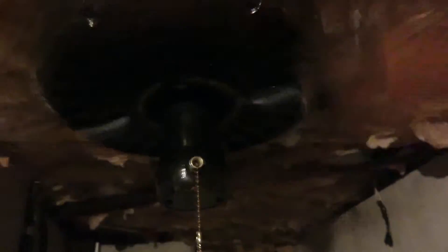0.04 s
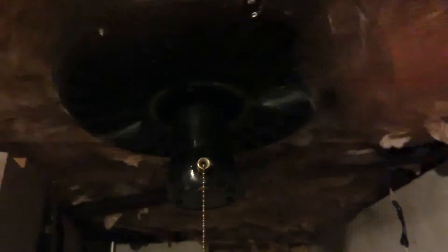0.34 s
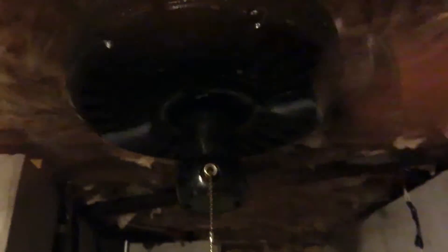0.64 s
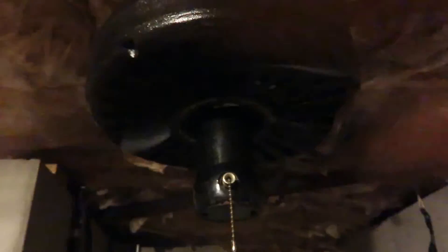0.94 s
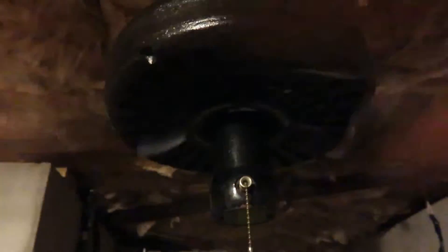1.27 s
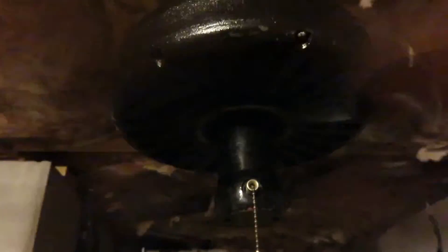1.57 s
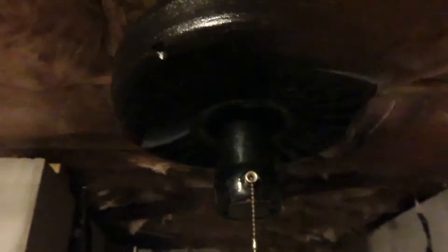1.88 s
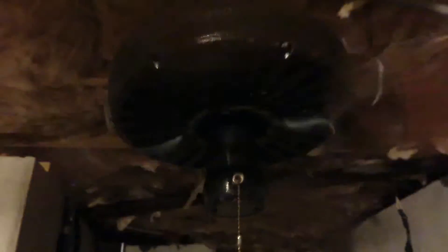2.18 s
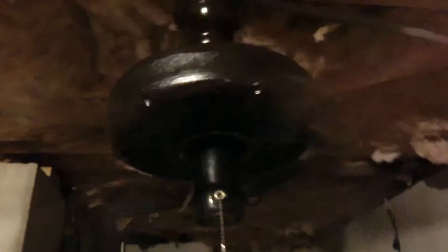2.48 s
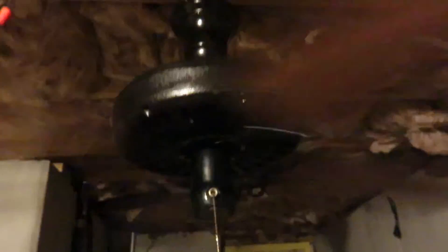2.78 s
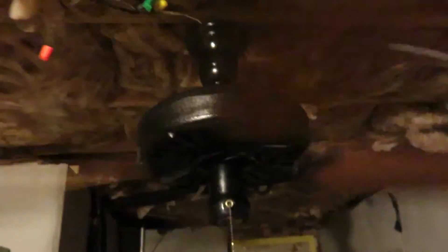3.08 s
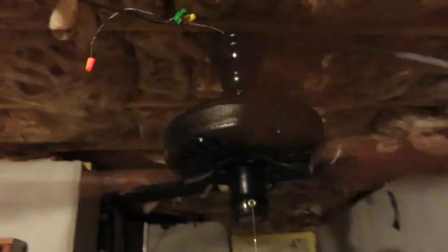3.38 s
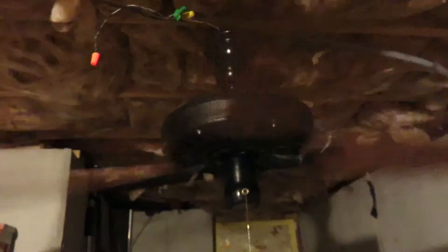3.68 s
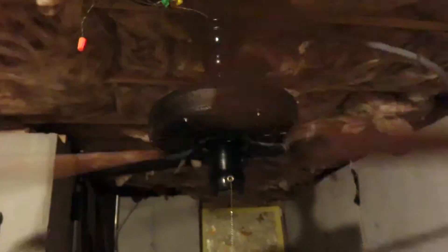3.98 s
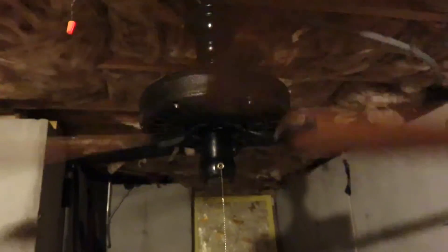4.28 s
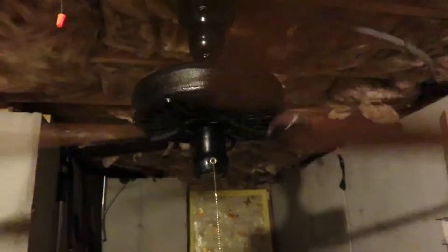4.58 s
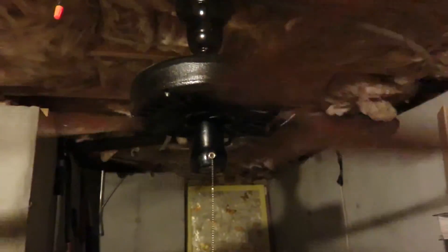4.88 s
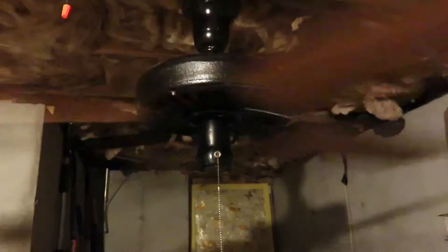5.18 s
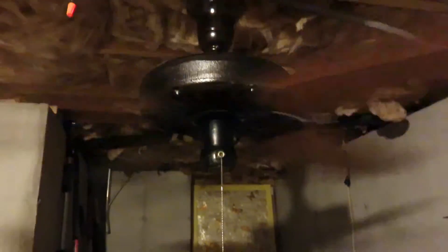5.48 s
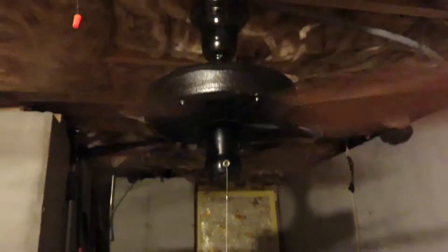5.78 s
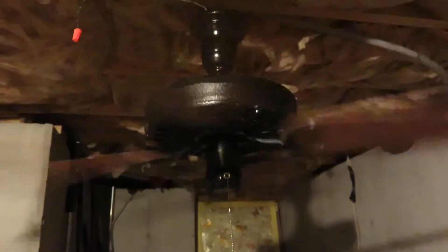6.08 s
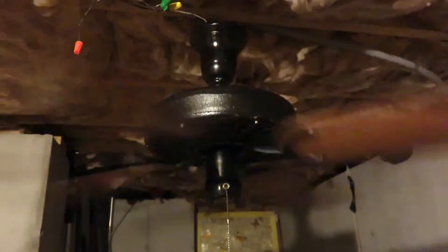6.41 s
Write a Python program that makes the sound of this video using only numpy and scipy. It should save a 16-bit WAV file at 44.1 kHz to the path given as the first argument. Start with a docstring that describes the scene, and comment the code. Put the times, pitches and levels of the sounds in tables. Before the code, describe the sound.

A ceiling fan's pull chain snaps sharply, then the swishing blades slow while their draught thumps against the microphone.

```python
"""A small room, close under a ceiling fan that is switched down by its pull chain.
Over a faint hiss of air the motor hums and a sleeve rustles a few times. The blades swish past ever
more slowly, and their downdraught buffets the microphone until it is drawn back. Early on comes the
tug: beads tick through the eyelet, the fan body thuds, and the switch snaps in and out."""
import sys
import numpy as np
from scipy import signal
from scipy.fft import rfft, irfft, next_fast_len
from scipy.io import wavfile
from scipy.ndimage import map_coordinates

SR = 44100
rng = np.random.default_rng(int(sys.argv[2]) if len(sys.argv) > 2 else 0)


def dump(signal):
    """Clip the signal to [-1, 1] and save it as 16-bit WAV at the path in sys.argv[1]."""
    limited = np.clip(np.atleast_2d(signal).T, -1, 1)
    pcm = np.round(limited * 32767).astype(np.int16)
    wavfile.write(sys.argv[1], SR, pcm)


N = 293265


def amp(db):
    """Decibels to gain."""
    return 10 ** (np.asarray(db) / 20)


def unit_rms(x):
    """x scaled to rms 1."""
    return x / np.sqrt(np.mean(x ** 2) + 1e-20)


def unit_peak(x):
    """x scaled to peak 1."""
    return x / np.abs(x).max()


def along(points, hz):
    """Reads (Hz, value) points on a log frequency axis."""
    freqs, values = np.transpose(points)
    return np.interp(np.log(hz + 1), np.log(freqs + 1), values)


def clock():
    """The time of every sample in seconds."""
    return np.arange(N) / SR


def curve(rows, column=1):
    """An automation lane: one column of (seconds, value, ..) rows, joined by straight lines."""
    columns = np.transpose(rows)
    return np.interp(clock(), columns[0], columns[column])


def wobble(rate):
    """A smooth random drift with `rate` knots a second."""
    knots = rng.standard_normal(int(N * rate / SR) + 4)
    return map_coordinates(knots, [np.arange(N) * rate / SR])


def filtered(x, response):
    """Equalises x by a gain that is a function of frequency."""
    size = x.shape[-1]
    padded = next_fast_len(size + 8192)
    return irfft(rfft(x, padded) * response(np.fft.rfftfreq(padded, 1 / SR)), padded)[..., :size]


def noise(spectrum, coherence, size=N):
    """Stereo noise of rms 1 with a given colour and left-right coherence."""
    def mid_side_gains(hz):
        width = np.arccos(np.clip(along(coherence, hz), -1, 1)) / 2
        return amp(along(spectrum, hz)) * [np.cos(width), np.sin(width)]
    mid, side = filtered(rng.standard_normal((2, size)), mid_side_gains)
    return unit_rms(np.array([mid + side, mid - side]))


def add(track, start, sound):
    """Mixes a sound into a track at `start` seconds."""
    part = track[..., max(round(start * SR), 0):][..., :sound.shape[-1]]
    part += sound[..., :part.shape[-1]]


def rubbing(strokes, spectrum, coherence, grain_db):
    """Soft, grainy strokes of friction that swell and fade."""
    swell = sum(amp(db) * np.exp(-.5 * ((clock() - s) / width) ** 2) for s, db, width in strokes)
    return swell * unit_rms(noise(spectrum, coherence) * amp(grain_db * wobble(280)))


# Colour of the room tone. Each row: frequency in Hz, relative level in dB.
AIR_COLOUR = [(20, -23), (45, -14), (62, -9), (130, -19), (260, 4), (420, -1.5), (900, 4), (2000, 0.5),
              (4000, -4.5), (6000, -10.5), (9000, -17), (12000, -22.5), (15500, -30)]
# Stereo image of diffuse sound. Each row: frequency in Hz, left-right coherence.
WIDE_IMAGE = [(120, .99), (250, 1), (500, -1.06), (950, -0.039), (1900, 0.22), (3800, 0.44), (7500, 0.16),
              (15000, -0.34)]

def room_tone(level_db=-51):
    """The air of the room lays a faint, steady hiss under everything."""
    return amp(level_db) * noise(AIR_COLOUR, WIDE_IMAGE)


def room_reverb(x, t60=0.14, wet_db=-21):
    """Close walls answer with a short tail, different on each side."""
    t = np.arange(SR // 3) / SR
    tail = rng.standard_normal((2, len(t))) * amp(-60 * t / t60) * (t > .004)  # 4 ms pre-delay
    return amp(wet_db) * signal.fftconvolve(x, tail / np.linalg.norm(tail[0]), axes=1)[:, :N]


# Sleeve rustles. Each row: centre in seconds, level in dB, half length in seconds.
SLEEVE_STROKES = [(1.98, -62, .02), (2.32, -60, 0.024), (2.708, -47.5, 0.014), (3.183, -55.5, 0.019),
                  (3.59, -64, 0.034), (3.772, -59, 0.025)]
# Colour of the cloth. Each row: frequency in Hz, relative level in dB.
CLOTH_COLOUR = [(1200, -14), (2500, 1), (4500, -4.5), (6000, 1), (9000, -5), (13000, -4.5), (16000, -18)]

def sleeve():
    """Cloth brushes on cloth as the arm draws back."""
    return rubbing(SLEEVE_STROKES, CLOTH_COLOUR, WIDE_IMAGE, grain_db=-1.0)


# From fan to microphone, drawn back halfway through. Each row: time in seconds, distance in metres.
MIC_DISTANCE = [(0, 0.3), (.2, .21), (.45, .28), (2.7, 0.29), (3.15, 0.37), (3.9, 0.54), (6.65, 0.56)]

def motor(mains_hz=60, mains_db=-9, waver_db=2, fast_db=-48.5, slow_db=-63.5, switch_s=0.36):
    """A hum at twice the mains frequency, fainter at the mains itself, wavers as the fan rocks."""
    phase = 2 * np.pi * mains_hz * clock()
    low = amp(mains_db) * unit_rms(np.sin(phase + 1.4 * wobble(2.34)))
    high = unit_rms(np.sin(2 * phase + 2.5 * wobble(8.3)) * amp(waver_db * wobble(4.9)))
    setting_db = curve([(switch_s, fast_db), (switch_s + 0.027, slow_db)])
    return amp(setting_db) / curve(MIC_DISTANCE) * (low + high)


FAST_PASS_HZ, SLOW_PASS_HZ = 13.78, 8.71

def blades_passed(t, coast_s=2.9, start_phase=.485):
    """Blades gone by at time t: drag slows the rotor towards its lower speed."""
    coasting = (FAST_PASS_HZ - SLOW_PASS_HZ) * coast_s * (1 - np.exp(-t / coast_s))
    return start_phase + SLOW_PASS_HZ * t + coasting


def blade_pulse(lag_s, crest=0.082):
    """Near +1 as a blade goes by and -1 between blades, the crest narrower than the lull."""
    angle = 2 * np.pi * blades_passed(clock() - lag_s)
    return np.cos(angle) + crest * np.cos(2 * angle)


# Colours of the swish, the trailing edge at full speed and the high wash.
# Each row: frequency in Hz, relative level in dB.
SWISH_COLOUR = [(80, -14.5), (200, 4.5), (420, 4.5), (600, 1.5), (800, -2), (1050, -11.5), (1600, -21.5),
                (4000, -51)]
EDGE_COLOUR = [(300, -44), (560, -12), (760, 4.5), (900, -7), (1150, -16), (2200, -51)]
WASH_COLOUR = [(500, -30), (1000, -10), (1600, -13), (2700, -20), (4500, -36.5), (10000, -55)]
# How deeply the swish pulses where the microphone is held. Each row: time in seconds, swing in dB.
SWISH_DEPTH = [(0, 3.5), (.45, 4.8), (1.1, 4.2), (1.7, 5), (2.2, 3.2), (2.9, 4), (3.5, 5), (4.3, 3.2),
               (6.65, 2.4)]
# Stereo image of close sounds. Each row: frequency in Hz, left-right coherence.
CLOSE_IMAGE = [(100, 1), (250, 1), (500, 0.98), (1000, 1), (3000, 0.89), (10000, 0.21)]

def blades(level_db=-50, speed_power=1.62, body_db=0.64, edge_db=-2.5, wash_db=-9.0, uneven_db=0.83):
    """Each blade swishes over a steadier wash; its hollow edge note sinks and fades with the speed."""
    passed = blades_passed(clock())
    speed = np.gradient(passed) * SR / FAST_PASS_HZ  # 1 on the fast setting
    read_at = passed / FAST_PASS_HZ * SR  # varispeed: the edge note follows the rotor
    edge = np.array([map_coordinates(side, [read_at]) for side in noise(EDGE_COLOUR, CLOSE_IMAGE)])
    swish = amp(body_db) * noise(SWISH_COLOUR, CLOSE_IMAGE) + amp(edge_db) * speed ** 4 * edge
    swell = amp(curve(SWISH_DEPTH) * blade_pulse(lag_s=0.00036) + uneven_db * wobble(11))
    wash = amp(wash_db) * swell ** 0.49 * noise(WASH_COLOUR, CLOSE_IMAGE)
    return amp(level_db) * speed ** speed_power / curve(MIC_DISTANCE) * (swell * swish + wash)


# The microphone lies in the downdraught, crosses its core, leaves it and drifts back to its edge.
# Each row: time in seconds, buffet fader in dB, rumble fader in dB.
DRAUGHT_FADERS = [(0, -33, -50), (.45, -40, -44.5), (.8, -34, -45), (1.4, -39.5, -46), (2.35, -36, -42),
                  (2.7, -34, -41), (2.8, -33, -35), (2.87, -47, -67), (3.3, -49, -68), (4.4, -53, -88),
                  (5.4, -45, -56), (6.65, -47, -55.5)]
# Colours of the buffet and the deep rumble. Each row: frequency in Hz, relative level in dB.
BUFFET_COLOUR = [(30, -21), (60, -6.5), (125, 1), (220, -5), (350, -6), (550, -23.5), (900, -37),
                 (2000, -61)]
RUMBLE_COLOUR = [(12, -14), (30, -4), (62, 6), (90, 2), (160, 0), (400, -70)]
# Stereo image at the microphone's ports. Each row: frequency in Hz, left-right coherence.
PORT_IMAGE = [(70, 0.98), (130, 1), (250, 0.87), (500, 0.47), (1000, 0.059)]

def draught(buffet_db=1.26, rumble_db=5.0, depth_db=3.0, lumpy_db=1.9):
    """Each blade's wake hits the microphone as a lumpy low puff, over a rumble that pulses less."""
    puffs = unit_rms(amp(depth_db * blade_pulse(lag_s=0.0051) + lumpy_db * wobble(35)))
    buffet = amp(curve(DRAUGHT_FADERS) + buffet_db) * noise(BUFFET_COLOUR, PORT_IMAGE)
    rumble = amp(curve(DRAUGHT_FADERS, column=2) + rumble_db) * noise(RUMBLE_COLOUR, PORT_IMAGE)
    return puffs * buffet + unit_rms(np.sqrt(puffs)) * rumble


# The ports pass little of an eddy's treble. Each row: frequency in Hz, gain in dB.
PORT_EQ = [(550, 1), (1100, -3), (1600, -5.5), (4000, -14)]

def eddy(hz, rise_s):
    """One eddy strikes the ports: a few cycles of low pressure swing, unlike on the two sides."""
    age = np.arange(SR // 8) / SR / rise_s
    envelope = (age * np.exp(1 - age)) ** 2
    colour = [(hz / 10, -26), (hz / 3, -8), (hz, 0), (hz * 1.38, -1),
              (hz * 2, -7), (hz * 3, -19), (hz * 6, -38), (hz * 30, -120)]
    pressure = noise(colour, PORT_IMAGE, size=len(age))
    return unit_peak(filtered(pressure, lambda f: amp(along(PORT_EQ, f))) * envelope)


# The strongest gusts. Each row: start in seconds, relative level in dB, centre in Hz, rise in seconds.
GUST_HITS = [(0.037, -33, 146, 0.0098), (0.485, -19, 146, 0.0073), (0.512, -25, 196, 0.0047),
             (0.64, -12, 227, 0.018), (0.861, -18.5, 570, 0.0053), (.926, -17.5, 158, 0.005),
             (1.001, -13, 194, 0.007), (1.282, -23, 580, 0.0067), (1.466, -16.5, 193, 0.0057),
             (1.553, -17.5, 165, 0.0097), (1.61, -29, 600, 0.0077), (1.707, -31, 533, 0.011),
             (1.768, -14, 176, 0.016), (1.806, -19, 140, 0.0043), (1.877, -30, 520, 0.01),
             (1.961, -11.5, 224, 0.0084), (2.04, -18, 151, 0.0086), (2.146, -3.5, 195, 0.012),
             (2.151, -14, 340, 0.0097), (2.232, -11, 203, 0.013), (2.387, -23.5, 159, 0.006),
             (2.418, -23, 140, 0.0056), (2.472, -9.5, 143, 0.015), (2.518, -19.5, 190, 0.011),
             (2.58, -10.5, 140, 0.011), (2.597, -9, 204, 0.011), (2.658, -19, 200, 0.016),
             (2.699, -10, 358, 0.0032), (2.714, -8.5, 179, 0.0073), (2.744, -18, 179, 0.012),
             (2.77, -5, 345, 0.0087), (2.774, -6, 139, 0.013), (2.812, -15, 174, 0.0053),
             (2.83, -24, 108, 0.0085), (2.98, -21.5, 206, 0.0062), (3.062, -35, 180, 0.0069),
             (3.164, -39, 300, 0.0067), (3.345, -30, 147, 0.015), (3.763, -34.5, 215, 0.0058),
             (5.29, -32, 150, 0.013), (5.388, -29.5, 181, 0.012), (5.602, -33, 170, 0.01)]

def gusts(trim_db=-1, chance=.5, eddy_db=4.5, spread_db=3, eddy_hz=136, rise_s=0.0076, stray_s=.025):
    """Gusts thump the microphone, among chance eddies in the blades' wakes that ride on the draught."""
    out = np.zeros((2, N))
    for start, db, hz, rise in GUST_HITS:
        add(out, start, amp(db + trim_db) * eddy(hz, rise))
    draught_db, passed = curve(DRAUGHT_FADERS), blades_passed(clock())
    wakes = np.searchsorted(passed, np.arange(1, int(passed[-1])))  # the sample of each blade pass
    for at, (luck, when, size, pitch) in zip(wakes, rng.uniform(-0.99, 1, (len(wakes), 4))):
        if abs(luck) < chance:
            db = draught_db[at] + eddy_db + spread_db * size
            start = at / SR + stray_s * when - rise_s
            add(out, start, amp(db) * eddy(eddy_hz * 2 ** (pitch / 2), rise_s))
    return out


# Thuds of the fan body. Each row: start in seconds, level in dB, pitch in Hz.
BODY_THUDS = [(0.333, -12, 172), (0.344, -1.5, 236), (0.6654, -10.5, 194)]
# Colour of its rattle. Each row: frequency in Hz, relative level in dB.
SHAKE_COLOUR = [(30, -29), (70, 1), (150, 7), (260, -1.5), (420, 1.5), (600, -8), (900, -23), (2000, -41),
                (6000, -86)]

def fan_body(rise_s=0.002, shake_db=-7, shake_rise_s=0.0065, lead_s=0.0045):
    """The tug jolts the fan body: a low, quickly damped swing inside a longer, irregular shake."""
    out, t = np.zeros((2, N)), np.arange(SR // 8) / SR
    swell = lambda rise: t / rise * np.exp(1 - t / rise)
    for start, db, hz in BODY_THUDS:
        add(out, start, amp(db) * swell(rise_s) * np.sin(2 * np.pi * hz * t))
        shake = noise(SHAKE_COLOUR, PORT_IMAGE, size=len(t)) * swell(shake_rise_s)
        add(out, start - lead_s, amp(db + shake_db) * unit_peak(shake))
    return out


# Modes of the switch housing. Each row: frequency in Hz, relative level in dB, free t60 in seconds.
HOUSING_MODES = [(2720, -9, .1), (3150, -2, .24), (4610, -4, .05), (4890, -5, .05), (5300, 3.5, .09),
                 (6320, -12, .05), (6620, -10, .05), (6900, -7, .05), (7450, -6, .08), (9240, -11, .05),
                 (10800, -3, .04), (11420, 0, .04), (12780, 1, .06), (13450, -2, .06), (14670, -7, .05)]

def housing_ring(t, linger, spread_db=2.0, settle_s=0.0051):
    """The struck housing rings: the contact damps most of it at once and the rest lingers."""
    ring = np.zeros(len(t))
    for hz, db, t60 in HOUSING_MODES:
        decay = amp(db + spread_db * rng.standard_normal() - 60 * t / t60)
        ring += decay * np.sin(2 * np.pi * (hz * t + rng.random()))
    return unit_peak(ring * (linger + np.exp(-t / settle_s)))


# Colour of metal on metal. Each row: frequency in Hz, relative level in dB.
METAL_COLOUR = [(1000, -26), (2500, -20), (3900, -17.5), (4700, -2.5), (5400, 5), (6100, -3), (7300, 2),
                (8300, -9), (9500, 1.5), (12000, 8.5), (14000, 3.5), (16000, -14)]

def metal_click(t, t60):
    """A hard metal contact gives a bright, nearly mono burst."""
    envelope = amp(-60 * t / t60) * (1 - np.exp(-t / 0.0001))
    return unit_peak(noise(METAL_COLOUR, [(1000, 0.94)], size=len(t)) * envelope)


# Slides and jingles of the chain. Each row: centre in seconds, level in dB, half length in seconds.
CHAIN_SLIDES = [(.174, -49, 0.01), (.306, -44.5, 0.004), (.322, -51.5, 0.017), (2.571, -48.5, 0.0021)]
CHAIN_JINGLES = [(.24, -69, .06), (.303, -57, .016), (.45, -72, .06), (.643, -58, 0.029), (.7, -58, 0.025)]
# Colour of the slides. Each row: frequency in Hz, relative level in dB.
SCRAPE_COLOUR = [(900, -18), (1800, -3), (2700, 1), (3300, 0), (3650, 9), (4000, -2), (6300, -12),
                 (7200, -9), (7600, 4), (8100, -11), (15000, -25)]

def chain_links():
    """The chain scrapes as it slides under tension, and its moving links jingle finely."""
    scrape = rubbing(CHAIN_SLIDES, SCRAPE_COLOUR, CLOSE_IMAGE, grain_db=0)
    return scrape + rubbing(CHAIN_JINGLES, METAL_COLOUR, CLOSE_IMAGE, grain_db=7)


# Soft taps of the chain. Each row: start in seconds, peak level in dB.
CHAIN_TAPS = [(.6325, -45), (.69, -43), (.7115, -41), (.729, -48)]
# A soft tap darkens the ring. Each row: frequency in Hz, gain in dB.
TAP_EQ = [(3200, 0), (5300, -11), (7500, -13), (14000, -22)]

def chain_taps():
    """The slack chain swings against the housing and rings its lower modes."""
    out, t = np.zeros(N), np.arange(SR // 5) / SR
    for start, db in CHAIN_TAPS:
        ring = filtered(housing_ring(t, linger=.6), lambda hz: amp(along(TAP_EQ, hz)))
        add(out, start, amp(db) * unit_peak(ring))
    return out


# Beads during the pull and its release. Each row: start in seconds, relative level in dB.
BEAD_TICKS = [(.197, -46), (.25, -37), (.2665, -42), (.281, -34), (.2905, -41), (.2988, -33), (.3122, -38),
              (.386, -45), (.47, -51), (.485, -51), (.56, -56), (.611, -36), (.634, -35), (.6515, -36),
              (.6676, -28), (.6838, -28), (.7015, -39)]

def chain_beads(trim_db=-1, ring_db=-17, slack_span_s=(.4, 0.51), slack_db=-55):
    """Beads tick through the eyelet; between pull and release the loose end ticks faintly."""
    out, t = np.zeros((2, N)), np.arange(SR // 5) / SR
    strays = [(start, slack_db) for start in rng.uniform(*slack_span_s, size=4)]
    for start, db in list(BEAD_TICKS) + strays:
        tick = metal_click(t, t60=0.011) + amp(ring_db) * housing_ring(t, linger=.1)
        add(out, start, amp(db + trim_db) * tick)
    return out


# Snaps, damped while the chain is taut and freer once it is let go. Each row: start in seconds,
# click level in dB, ring level against the click in dB, weight of the lingering ring.
SWITCH_SNAPS = [(0.3314, -32, -15, .03), (0.3388, -8, -6, .015), (0.3386, -12, -8.5, .015),
                (0.343, -14.5, -2, .025), (0.6717, -22.5, -2, 0.1), (0.675, -28, 0.5, .06)]
# Clacks of the switch's plastic rotor. Each row: start in seconds, peak level in dB.
NOTCH_CLACKS = [(0.3391, -26.5), (.672, -24.5)]
# Colour of a clack. Each row: frequency in Hz, relative level in dB.
CLACK_COLOUR = [(800, -17), (1400, 1), (2000, -3.5), (2700, 5.5), (3200, -1.5), (3900, -24), (5200, -5),
                (6200, -30.5), (15000, -43)]

def switch(clack_t60=0.034):
    """The switch snaps and rings its housing, and its rotor clacks into the notch."""
    out, t = np.zeros((2, N)), np.arange(SR // 5) / SR
    for start, db, ring_db, linger in SWITCH_SNAPS:
        snap = metal_click(t, t60=0.0078) + amp(ring_db) * housing_ring(t, linger)
        add(out, start, amp(db) * snap)
    for start, db in NOTCH_CLACKS:
        clack = noise(CLACK_COLOUR, CLOSE_IMAGE, size=len(t)) * amp(-60 * t / clack_t60)
        add(out, start, amp(db) * unit_peak(clack))
    return out


def scene():
    """Fan, pull chain and sleeve over the room tone; only chain and switch feed the reverb."""
    pull_chain = chain_beads() + switch() + chain_links() + chain_taps()
    fan = blades() + draught() + gusts() + motor() + fan_body()
    return fan + pull_chain + room_reverb(pull_chain) + sleeve() + room_tone()


def record(dry, ceiling=.97, top_hz=15500):
    """A soft clip rounds off the tallest peaks, and a steep low-pass cuts the very top."""
    rounded = dry / (1 + np.abs(dry / ceiling) ** 8) ** (1 / 8)
    return filtered(rounded, lambda hz: 1 / np.sqrt(1 + (hz / top_hz) ** 160))


dry = scene()
out = record(dry)
dump(out)
```